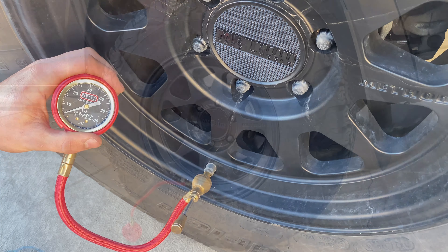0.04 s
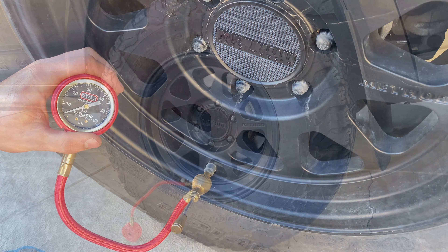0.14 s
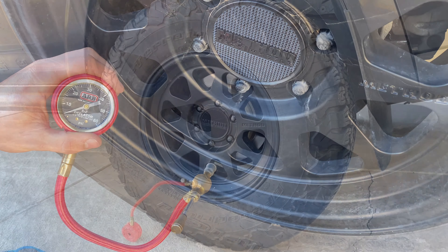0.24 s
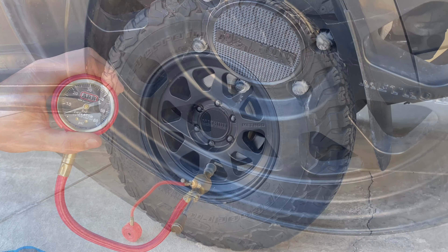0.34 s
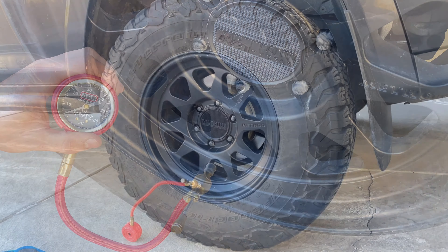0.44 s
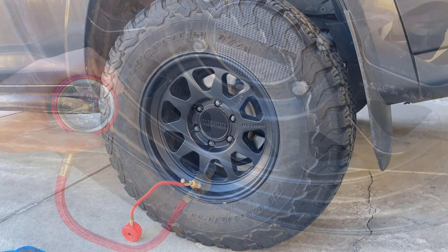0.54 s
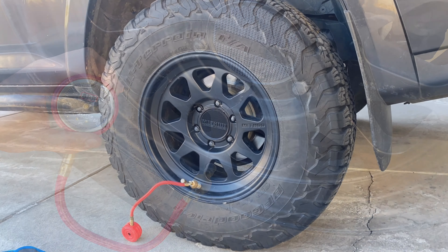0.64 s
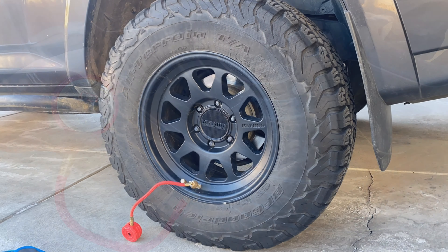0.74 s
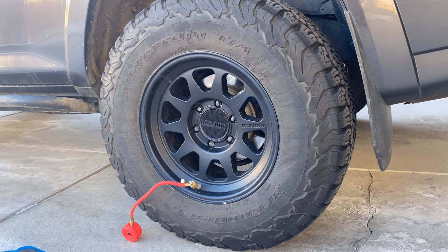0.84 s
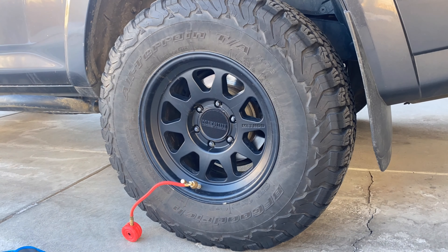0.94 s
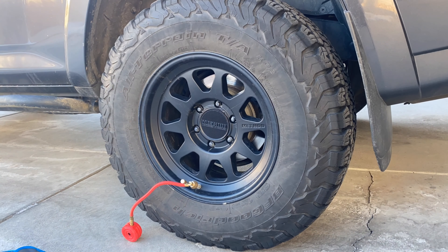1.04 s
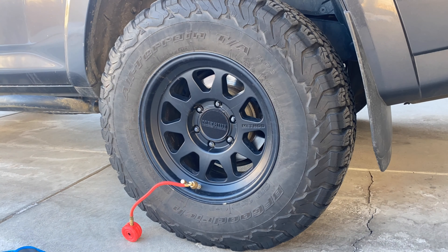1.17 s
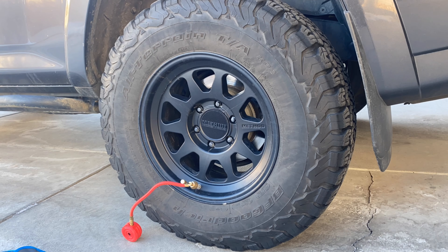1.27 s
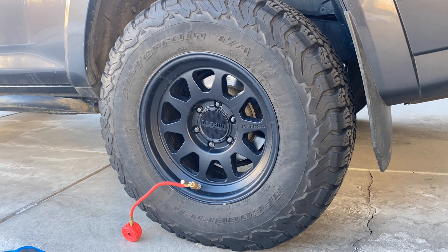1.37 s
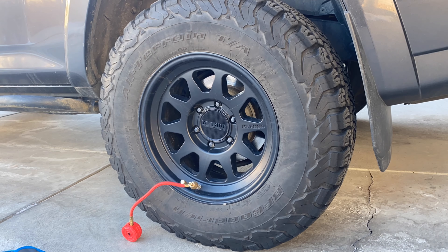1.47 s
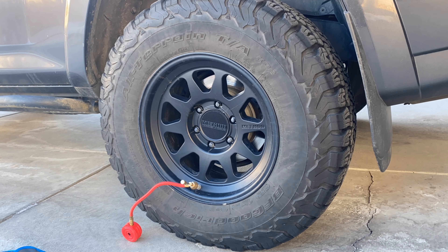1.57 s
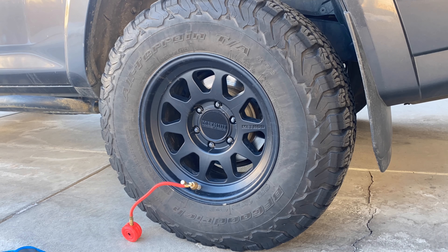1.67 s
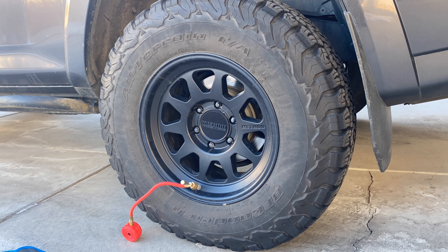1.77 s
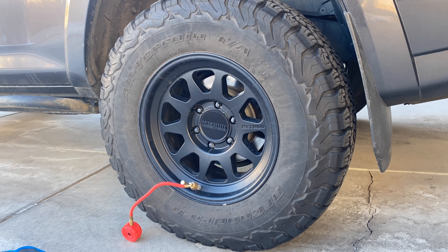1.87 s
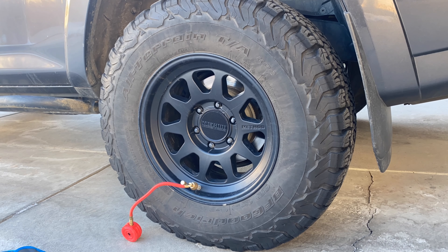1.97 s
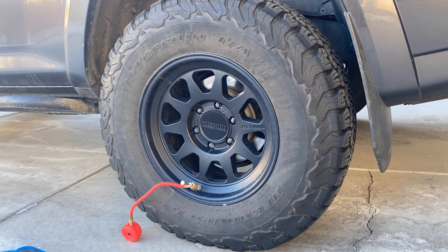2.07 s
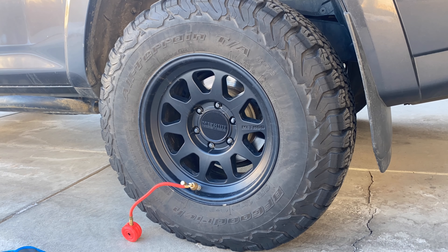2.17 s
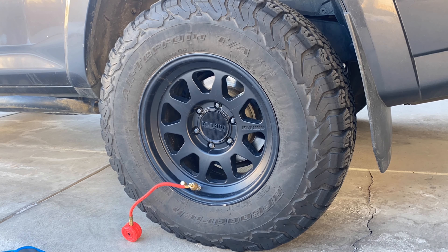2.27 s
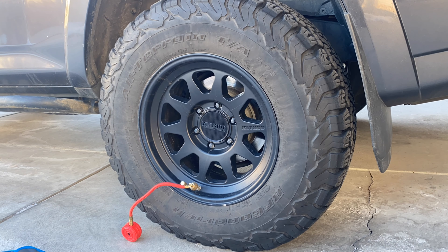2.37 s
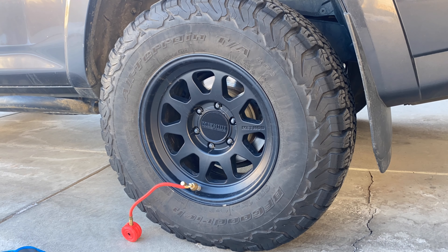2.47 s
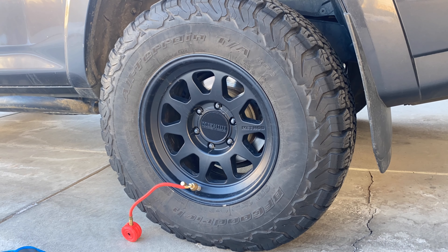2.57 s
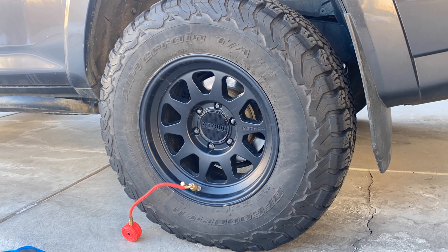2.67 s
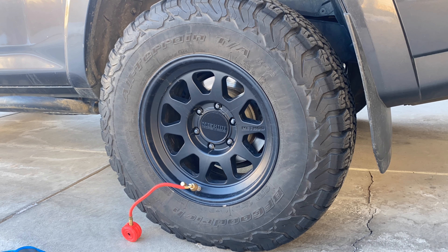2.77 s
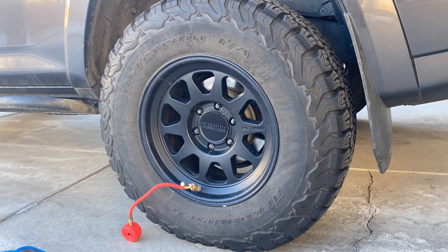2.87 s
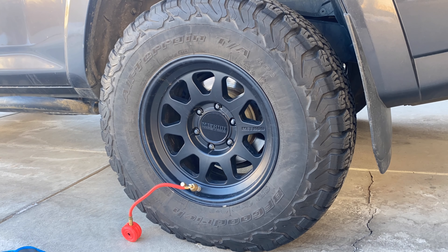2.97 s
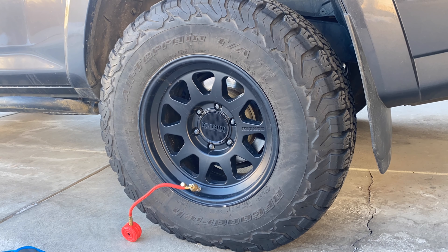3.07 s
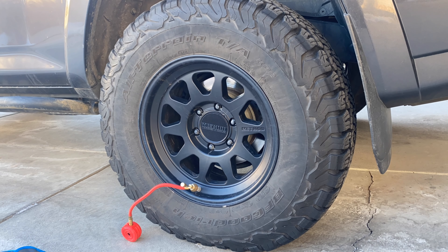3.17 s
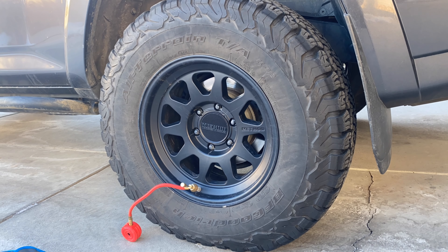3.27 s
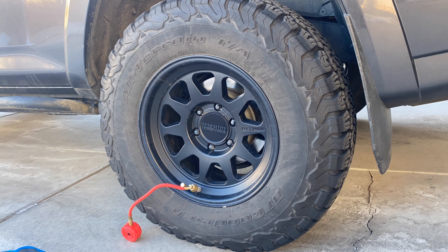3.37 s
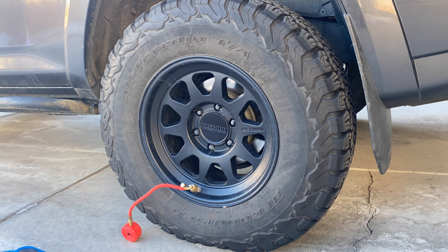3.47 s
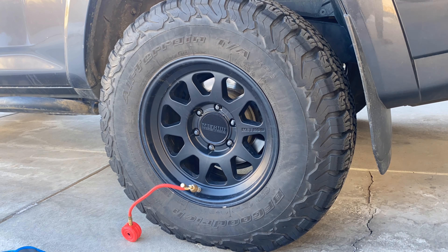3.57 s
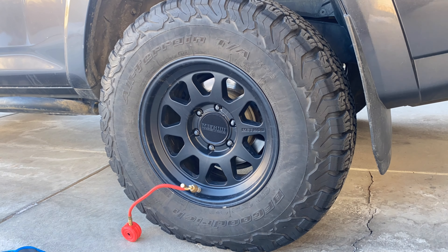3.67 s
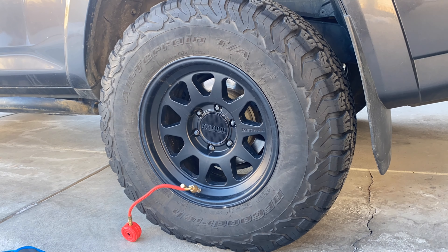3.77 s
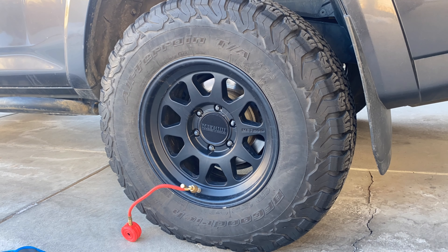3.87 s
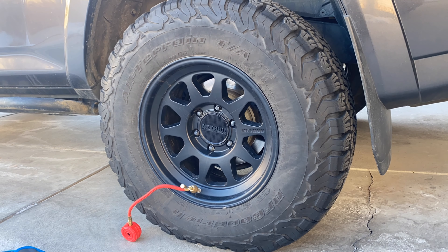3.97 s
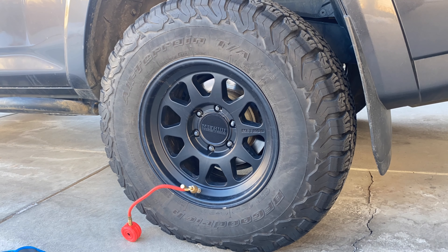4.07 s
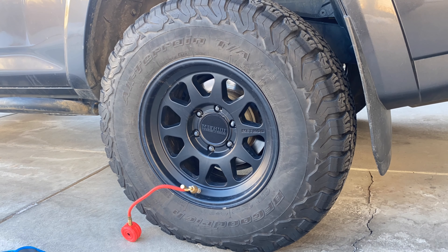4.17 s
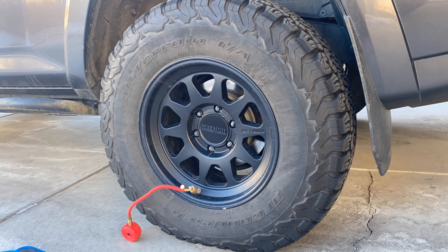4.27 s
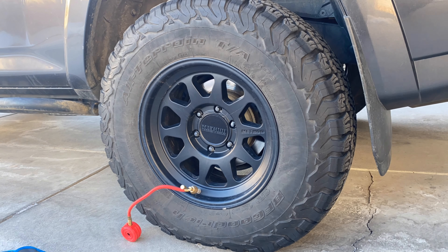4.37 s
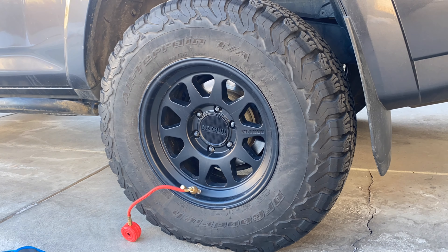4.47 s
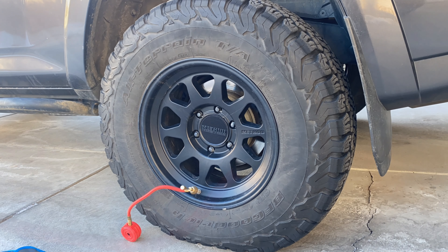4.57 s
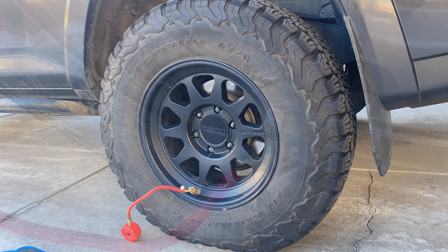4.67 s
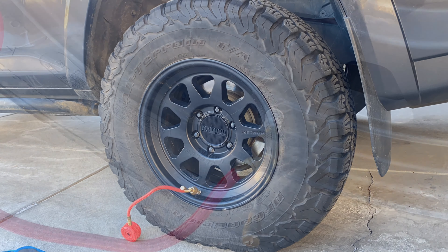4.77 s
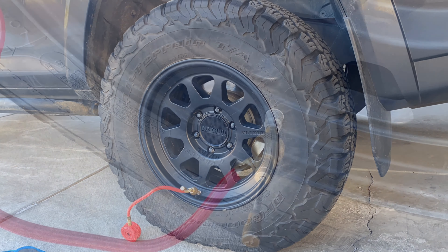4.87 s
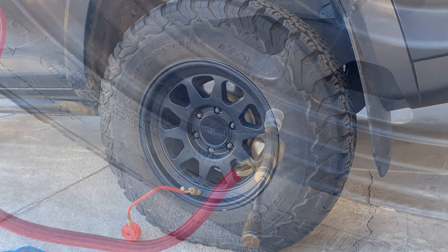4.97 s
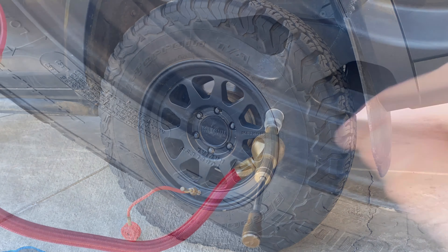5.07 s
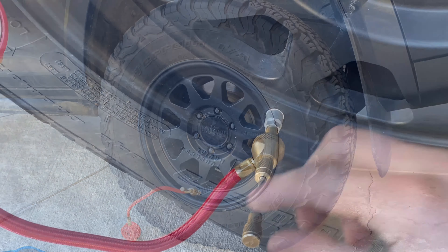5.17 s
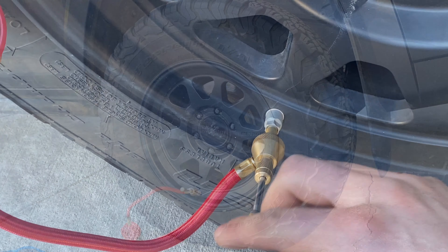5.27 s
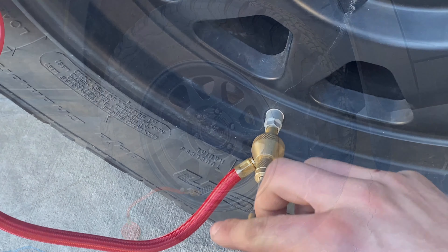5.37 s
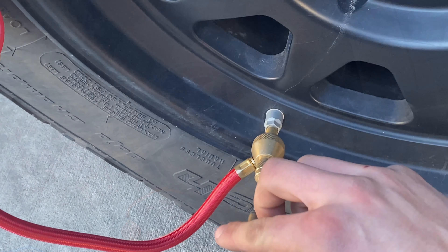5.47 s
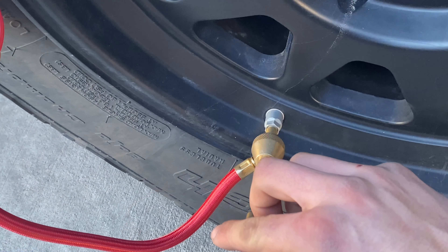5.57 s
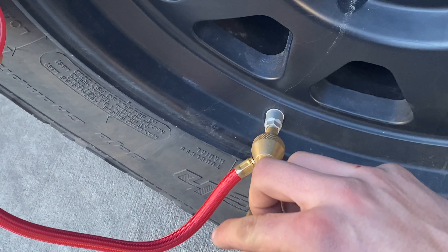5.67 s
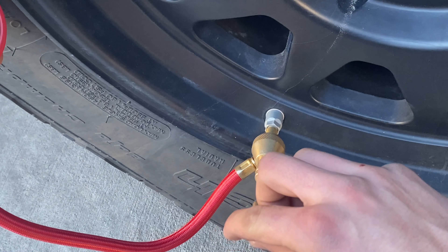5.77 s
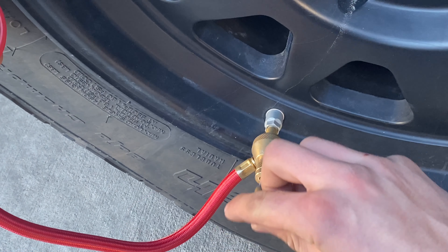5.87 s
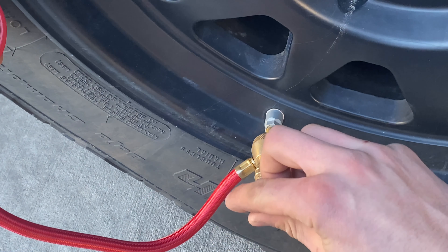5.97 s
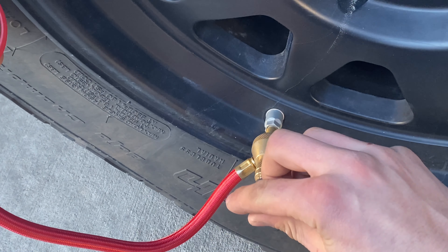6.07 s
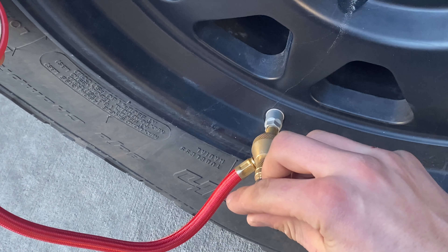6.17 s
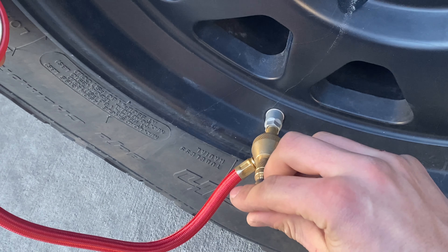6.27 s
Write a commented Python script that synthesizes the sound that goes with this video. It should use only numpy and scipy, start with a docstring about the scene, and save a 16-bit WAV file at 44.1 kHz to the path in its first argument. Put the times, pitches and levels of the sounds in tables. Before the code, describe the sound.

Close outdoor sound in a driveway, wide stereo with short reflections. From 0 s bright, dense air hiss pours from a tyre through a brass deflator, slightly softer for the first 0.2 s, then steady with fine flutter, strongest in the high treble. Faint ticks of brass come at about 0.1, 0.5 and 1.0 s; a dull, distant thud sinks at 1.1 s. The hiss swells a little from 2.5 to 3.8 s, with a tick at 2.9 and a sharper one at 3.9 s. A hard little knock falls at 4.2 s, with a click just after, another at 5.4 s. Beneath lie low traffic rumble, a faint hum and a remote engine droning, dropping in pitch towards the end. From about 5.5 s the hiss throttles away; at 5.9 s a brief air spurt and crisp double clack shut the valve, the wheel rings faintly, and by 6.1 s only quiet background remains until 6.3 s.

```python
"""In a driveway, air jets steadily out of a tyre through a brass deflator: coloured noise that sags slowly.
The brass clicks now and then: short forces set resonances ringing, and the yard scatters the sound.
At the end the hiss is already fading when the valve core is pushed home with a noise spurt and a double
clack; it goes silent just after. Behind it a distant engine drones and slows and a machine hums (both sine
tones), something thuds once (a sinking tone and ringing modes), and far traffic rumbles (low noise)."""
import sys
import numpy as np
from scipy import signal
from scipy.fft import rfft, irfft, next_fast_len
from scipy.io import wavfile

SR = 44100
rng = np.random.default_rng(int(sys.argv[2]) if len(sys.argv) > 2 else 0)


def file_out(sig):
    """Save sig as 16-bit WAV at sys.argv[1]."""
    # one column per channel
    cols = np.atleast_2d(sig).T
    # limit, then scale
    lim = np.clip(cols, -1, 1)
    pcm = np.round(lim * 32767).astype(np.int16)
    wavfile.write(sys.argv[1], SR, pcm)


N = 278706
TIME = np.arange(N) / SR
HZ = np.maximum(np.fft.rfftfreq(2 * next_fast_len(N // 2 + 1), 1 / SR), 1)  # from 1 Hz, so its log exists

# colour of the air jet, relative: f/Hz, level per Hz/dB
JET = [(200, -25.5), (500, -15), (660, -17.5), (870, -13), (1080, -22), (1380, -16), (1880, -11.5),
       (2070, -15), (2450, -12.5), (2680, -14.5), (3100, -15), (3500, -11.5), (4200, -6.5), (4420, -14),
       (4680, -6.5), (4980, -10), (5250, -8.5), (5550, -14.5), (6150, -11), (6600, -10), (7200, -9.5),
       (8550, -3), (9100, -3), (9900, -1.4), (10800, -0.8), (11300, 1.7), (11750, -3.5), (12550, 3.5),
       (13200, 2.3), (14600, 1.7), (14950, -2.5), (15200, 4.3), (15600, -2.5)]
# how the jet differs between left and right: f/Hz, likeness 0-1, left lead/rad, left minus right/dB
JET_SIDES = [(200, 0.96, 0.0, 0.1), (600, 0.53, 0.3, 2.0), (1300, 0.39, -0.1, 0.4), (1700, 0.76, 0.3, -0.9),
             (2400, 0.94, 0.0, 0.1), (2900, 0.58, -0.0, -0.6), (3150, 0.43, -3.2, -0.9),
             (3700, 0.3, -2.9, 0.7), (4300, 0.55, -3.1, 2.1), (4750, 0.25, -4.3, 1.8),
             (5400, 0.86, -3.2, 0.2), (6600, 0.4, 0.6, 0.3), (7900, 0.42, 2.5, -0.0),
             (8600, 0.61, 1.8, 1.1), (9300, 0.85, 3.0, -0.1), (10400, 0.55, 2.5, -4.8),
             (10900, 0.19, 2.2, -6.9), (11350, 0.79, -0.2, -1.5), (12600, 0.78, -0.9, -0.5),
             (14000, 0.68, -1.8, 1.8), (15100, 0.84, -3.0, 2.1)]
# the hiss starts at this level and sinks slowly as the tyre empties
HISS_DB, SAG_DB_PER_S = -27.5, 0.284
# spells of softer or stronger hiss: start t/s, end t/s, fade-in/s, fade-out/s, change/dB
SPELLS = [(-0.1, 0.23, 0.05, 0.034, -3.5), (0.6, 2.84, 0.6, 0.31, -0.83), (2.528, 3.8, 0.22, 0.097, 2.5)]
# the valve is pushed shut: when it seals, time scale of the throttling, how steeply the hiss follows the gap
SEALED_S, THROTTLE_S, THROTTLE_POWER = 6.106, 0.17, 2.3
# the last spurt swells up to the clack: t/s, level/dB relative to the spurt
SPURT_SWELL = [(5.895, -70), (5.904, -15), (5.912, -1), (5.921, 0), (5.927, -18), (5.950, -110)]
# colour of the spurt, relative: f/Hz, level per Hz/dB
SPURT_COLOUR = [(20, -48.5), (200, -8.0), (700, 0.0), (1500, -13.5), (2600, -5.0), (4600, -13.5),
                (6000, 2.0), (8000, 0.0), (9200, -6), (11400, 6.0), (13000, -19.0), (16000, -0.5)]

# light ticks of the brass parts: t/s, nominal peak level/dB, scraping share/dB, ring f/Hz,
# thin below f/Hz, dull above f/Hz
CLICKS = [(0.062, -30.5, 10, 596, 150, 4040), (0.533, -34, 6, 1700, 300, 6000),
          (0.963, -32, 5, 450, 110, 2200), (2.912, -29, 3, 1707, 400, 5000),
          (3.945, -22.5, 8, 5870, 900, 12000), (4.2934, -25.5, -7, 860, 348, 1700),
          (5.430, -30.5, 2, 1510, 497, 10000)]
# resonances of the deflator body: f/Hz, width/Hz, level/dB
BRASS = [(260, 330, -17), (440, 28, -8), (966, 154, -3), (1250, 370, -0.5), (1700, 93, 2), (2510, 1000, -3),
         (4080, 1600, -7), (5900, 1300, 0.5), (7700, 1100, -6)]
# modes of the hose fitting: f/Hz, level/dB, time to fall 60 dB/s
FITTING = [(339.5, -22, .03), (455, -22, 0.15), (690, -20, .025), (975, -1.5, 0.029), (1226, -6.5, 0.023),
           (1380, -2.5, 0.016), (1860, -8, 0.03), (2620, -9, 0.021), (2970, -5, 0.023),
           (3320, -10.5, 0.027), (4575, -11.5, 0.038), (5870, -2, 0.018), (8400, -11, 0.012)]
# modes of the valve as its core seats: f/Hz, level/dB, time to fall 60 dB/s
VALVE = [(140, -12.5, 0.035), (250, -14.5, 0.024), (336, -11.5, 0.026), (424, -14.5, 0.028),
         (516, -19.5, .05), (700, -19, .035), (834, -9, 0.045), (963, -10, .035), (1090, -10.5, 0.062),
         (1375, -4.5, .032), (1760, -15, .03), (2120, -13, 0.028), (2380, -13, 0.026), (2620, -11.5, 0.035),
         (5760, -11, .025), (5850, -6.5, 0.022), (6840, -11, 0.015), (7160, -4, 0.014), (11400, -18, 0.017)]
# modes of the sliding stem: f/Hz, level/dB, time to fall 60 dB/s
STEM = [(350, -15, .03), (620, -20, 0.027), (781, -8, 0.056), (985, -14.5, .03), (1324, -4, 0.032),
        (1460, -9, 0.037), (1690, -19, 0.037), (2160, -17.5, 0.045), (2640, -21.5, 0.045), (3120, -22, .05),
        (3810, -15, .045), (3990, -9.5, .04), (4220, -10, .04), (4490, -11.5, .04), (4580, -13.5, 0.058),
        (5100, -11, 0.04), (5450, -13, .035), (5770, -16, 0.03)]
# hard knocks: t/s, ring level/dB, crack level/dB before filtering, crack rise/s, rattle share/dB,
# thin below f/Hz, dull above f/Hz, echo delay/s, echo level/dB, clean strike share 0-1, modes that ring
KNOCKS = [(4.2360, -15.5, -7.5, 0.0006, -21.5, 620, 9700, .0036, -8, 0.16, FITTING),
          (5.9221, -11.5, -4.5, 0.0003, -19.5, 110, 8100, 0.00236, -1, 0.75, VALVE),
          (5.9505, -15, -6.5, 0.00047, -16, 250, 5570, 0.00184, -11, 0.67, STEM)]
# both closing knocks travel down the valve stem into the wheel: t/s, level/dB
WHEEL_BLOW = [(5.9227, -31), (5.951, -27.5)]
# modes of the wheel: f/Hz, level/dB, time to fall 60 dB/s
WHEEL = [(488, -10, 0.19), (1047, -19.5, 0.91), (1066, -20, 0.46), (1124, -4, 0.24), (1434, -27, .35),
         (1730, -37, .7), (2191, -32, 0.59), (2283, -24, 0.66), (3128, -33, .8)]
# faint wheel overtones: range, middle level, time to fall 60 dB
OVERTONES_HZ, OVERTONES_DB, OVERTONES_T60_S = (1264, 5300), -36.5, 0.56
# reverberation between house and car: f/Hz, time to fall 60 dB/s
YARD_T60 = [(200, 0.19), (1000, 0.17), (4000, 0.18), (8000, 0.038), (16000, 0.093)]

# distant engine, cruising, easing off, pulling again and running down: t/s, firing rate f/Hz
ENGINE_SPEED = [(0, 110.9), (1.38, 112), (1.6, 97.75), (2.1, 104.7), (2.8, 104.1), (3.6, 114), (4.5, 118.4),
                (4.85, 94.06), (5.4, 86.4), (5.75, 65.22), (6.32, 66.63)]
ENGINE_DB, ENGINE_SWELL_S = -50, 0.13   # its level between swells; spread of a bell-shaped swell
# its drone swells: t/s, rise/dB
ENGINE_SWELLS = [(0.15, 7), (2.38, 5.5), (3.37, 12), (4.33, 8), (4.83, 7.5), (5.33, 11.5), (5.85, 9),
                 (6.29, 8.5)]
# machine hum, which sags in pitch for a while: t/s, f/Hz
HUM_PITCH = [(0, 226), (1.3, 227), (1.7, 215.2), (4.4, 216.3), (4.9, 223.5), (6.32, 225.6)]
# its level before the overall trim: t/s, level/dB
HUM_LEVEL = [(0, -59), (1.3, -62.5), (1.7, -49.5), (2.5, -51.5), (3.4, -61.5), (5.5, -47.5), (6.32, -48)]
# two contacts of a dull thud: t/s, level/dB before filtering
THUDS = [(1.1245, -26.5), (1.153, -32)]
# its modes: f/Hz, level/dB, time to fall 60 dB/s
THUD_MODES = [(175, -14, 0.06), (246, -5, 0.079), (282, -7.5, 0.09)]
# the boom under the thud
BOOM_S, BOOM_DB, BOOM_ATTACK_S, BOOM_HOLD_S, BOOM_RELEASE_S = 1.113, -24.5, 0.015, .044, 0.068
BOOM_HZ, BOOM_SAG_HZ_PER_S = 100, 81
# street noise over time, before trims: t/s, low rumble/dB, upper rumble/dB, deep rumble/dB
STREET_LEVEL = [(0, -49.5, -50.5, -85), (4.4, -55.5, -48, -82), (4.8, -51, -48.5, -61),
                (5.3, -45.5, -47, -55), (5.7, -54, -49.5, -52), (6.32, -44.5, -50.5, -65.5)]
# colours of the three rumbles, relative; each one: f/Hz, level per Hz/dB
LOW_RUMBLE = [(20, -52), (40, -17.5), (60, 2), (85, 14), (110, 9.5), (170, -32.5), (1000, -100)]
UPPER_RUMBLE = [(20, -65), (60, -38), (100, 1.5), (140, 0.5), (195, -3), (250, -8.5), (330, -11.5),
                (450, -20.5), (650, -25), (1050, -26), (1700, -33), (4000, -46.5), (7000, -63),
                (16000, -73)]
DEEP_RUMBLE = [(20, -31), (38, -9), (52, 3.5), (70, 2), (160, -52)]
CUTOFF_HZ = 15720   # nearly nothing is left above this


def jet(flutter_db=0.86, flutter_rate_hz=25):
    """Turbulent air makes bright noise, strongest above 12 kHz; it follows the flow and flutters slightly."""
    flutter = from_db(flutter_db * drift(flutter_rate_hz))
    return flow() * flutter * noise(JET, *at_hz(JET_SIDES, HZ))


def flow():
    """Gain of the hiss: slowly sinking, with a few spells, then throttled ever faster until the valve seals."""
    db = HISS_DB - SAG_DB_PER_S * TIME
    for start, end, fade_in, fade_out, change_db in SPELLS:
        fade = np.minimum((TIME - start) / fade_in, (end - TIME) / fade_out)
        db = db + change_db * np.clip(fade, 0, 1)
    gap = 1 - np.exp(-np.maximum(SEALED_S - TIME, 0) / THROTTLE_S)
    return from_db(db) * gap ** THROTTLE_POWER


def spurt(level_db=-22):
    """The closing valve squeezes out a last short burst of noise that swells up to the clack."""
    swell_db, = in_time(SPURT_SWELL)
    return from_db(level_db + swell_db) * (TIME > 5.895) * noise(SPURT_COLOUR, coherence=.6)


def deflator(crest_db=10):
    """Ticks and knocks of the brass parts with their reflections; the closing pair rings the wheel."""
    out = np.zeros((2, N))
    for s, peak_db, *contact in CLICKS:
        add(out, s, from_db(peak_db - crest_db) * click(*contact))   # from nominal peak to rms
    for s, *contact in KNOCKS:
        add(out, s, knock(*contact))
    return out + yard(out, wet_db=-14.5) + wheel()


def click(scrape_db, ring_hz, thin_hz, dull_hz, scrape_s=0.013, chatter_s=0.024, chatter_db=-14,
          raw_db=-17, ring_db=2, echo_s=0.00241, echo_db=-11, side_db=-3):
    """A contact, scraping and chatter ring the brass; the concrete returns an echo. Attack has rms 1."""
    t = TIME[:SR // 8]
    shape = np.exp(-t / scrape_s) + from_db(chatter_db) * np.exp(-t / chatter_s)
    mid, side = rng.standard_normal((2, len(t))) * shape / np.linalg.norm(shape)
    # mainly the treble differs between the sides
    side = from_db(side_db) * highpass(side, 1500, order=1) * [[1], [-1]]
    force = (t == 0) + from_db(scrape_db) * (mid + side)
    body = sum(from_db(db) * resonate(force, hz, width) for hz, width, db in BRASS)
    own_ring = from_db(ring_db) * resonate(force, ring_hz, ring_hz * 0.32)
    sound = body + own_ring + from_db(raw_db) * force
    sound = lowpass(highpass(sound, thin_hz), dull_hz, order=4)
    echo = np.roll(lowpass(sound, 4500), int(echo_s * SR), axis=1)
    sound = sound + from_db(echo_db) * echo
    attack = sound[:, :SR // 400]
    return sound / np.sqrt(np.mean(attack ** 2))


def knock(ring_db, crack_db, rise_s, rattle_db, thin_hz, dull_hz, echo_s, echo_db, clean, modes,
          rattle_s=0.015, side_db=-7, echo_dull_hz=3000, spread_s=0.0018):
    """Metal meets metal: a strike in a gritty crack, a rattle, an echo off the rim; the struck part rings."""
    t = TIME[:SR // 4]
    mid, side = rng.standard_normal((2, len(t)))
    grit = mid + from_db(side_db) * highpass(side, 1500, order=1) * [[1], [-1]]
    contact = t / rise_s * np.exp(1 - t / rise_s)
    strike = np.arange(len(t)) == np.argmax(contact)
    # keep only the phases, so all frequencies are equally strong; then shorten
    burst = irfft(np.exp(1j * np.angle(rfft(grit * contact))), len(t)) * np.exp(-t / spread_s)
    clean = np.clip(clean, 0, 1)
    hit = np.linalg.norm(contact) * (np.sqrt(clean) * strike + np.sqrt(1 - clean) * burst)
    rattle = from_db(rattle_db) * np.exp(-t / rattle_s) * grit
    crack = from_db(crack_db) * lowpass(highpass(hit + rattle, thin_hz), dull_hz, order=6)
    echo = from_db(echo_db) * np.roll(lowpass(crack, echo_dull_hz), int(echo_s * SR), axis=1)
    tone = sum(from_db(db - 60 * t / t60) * np.sin(2 * np.pi * (hz * t + rng.random()))
               for hz, db, t60 in modes)
    return crack + echo + from_db(ring_db) * tone * (1 - np.exp(-t / rise_s))


def wheel(count=36, scatter_db=3):
    """The closing knocks ring a few clear wheel modes under faint overtones that differ on each side."""
    places = rng.random((2, count))
    sizes_db = OVERTONES_DB + scatter_db * rng.standard_normal((2, count))
    low, high = OVERTONES_HZ
    haze = []
    for side_places, side_db in zip(places, sizes_db):
        modes = [(low * (high / low) ** u, db, OVERTONES_T60_S) for u, db in zip(side_places, side_db)]
        haze.append(ring(WHEEL_BLOW, modes))
    return ring(WHEEL_BLOW, WHEEL) + np.array(haze)


def yard(x, wet_db):
    """Scattered reflections, unrelated on the two sides; each band of noise dies away at its own pace."""
    t, edges, tail = TIME[:SR // 2], np.geomspace(150, 16000, 9), 0
    for low, high in zip(edges, edges[1:]):
        sos = signal.butter(2, [low, high], "band", fs=SR, output="sos")
        band = signal.sosfilt(sos, rng.standard_normal((2, len(t))))
        t60, = at_hz(YARD_T60, np.sqrt(low * high))
        tail = tail + band * from_db(-60 * t / t60)
    tail = tail * (1 - np.exp(-t / 0.0023))   # soft build-up
    tail = tail / np.sqrt(np.sum(tail ** 2) / 2)
    return from_db(wet_db) * signal.fftconvolve(x, tail, axes=1)[:, :N]


def engine(second_db=-15, third_db=-21, wander=0.0198, throb_db=3.0):
    """A distant exhaust note at the firing rate, swelling and a little uneven, with two weak overtones."""
    hz, = in_time(ENGINE_SPEED)
    swells_db = sum(rise_db * np.exp(-.5 * ((TIME - s) / ENGINE_SWELL_S) ** 2)
                    for s, rise_db in ENGINE_SWELLS)
    phase = 2 * np.pi * np.cumsum(hz * (1 + wander * drift(7.06))) / SR
    overtones = from_db(second_db) * np.sin(2 * phase) + from_db(third_db) * np.sin(3 * phase)
    gain = from_db(ENGINE_DB + swells_db + throb_db * drift(9.2))
    return gain * np.sqrt(2) * (np.sin(phase) + overtones)


def hum(trim_db=-3.5, waver_db=1.5):
    """The tone of a machine nearby: one sine that follows the pitch table and wavers in level."""
    (hz,), (db,) = in_time(HUM_PITCH), in_time(HUM_LEVEL)
    gain = from_db(db + trim_db + waver_db * drift(2.7))
    return gain * np.sqrt(2) * np.sin(2 * np.pi * np.cumsum(hz) / SR)


def thud(thin_hz=110, dull_hz=380):
    """A dull, heavy bump some way off: two soft contacts over a short boom that sinks in pitch."""
    t = np.maximum(TIME - BOOM_S, 0)
    left_s = BOOM_ATTACK_S + BOOM_HOLD_S + BOOM_RELEASE_S - t
    shape = np.clip(np.minimum(t / BOOM_ATTACK_S, left_s / BOOM_RELEASE_S), 0, 1)
    tone = np.sin(2 * np.pi * (BOOM_HZ - .5 * BOOM_SAG_HZ_PER_S * t) * t)
    contacts = lowpass(highpass(ring(THUDS, THUD_MODES), thin_hz), dull_hz, order=4)
    return from_db(BOOM_DB) * shape * tone + contacts


def street(upper_trim_db=2.):
    """Far traffic as noise: a low rumble, a wash above it and a deep murmur that joins near the end."""
    low_db, upper_db, deep_db = in_time(STREET_LEVEL)
    low = from_db(low_db) * noise(LOW_RUMBLE, coherence=1.0)
    upper = from_db(upper_db + upper_trim_db) * noise(UPPER_RUMBLE, coherence=0.86)
    deep = from_db(deep_db) * noise(DEEP_RUMBLE, coherence=0.98)
    return low + upper + deep


def noise(spectrum, coherence=0, lead=0, balance_db=0):
    """Stereo noise of rms about 1 with a given colour, likeness, left phase lead and balance of the sides."""
    shared, left, right = rng.standard_normal((3, len(HZ))) + 1j * rng.standard_normal((3, len(HZ)))
    alike = np.clip(coherence, 0, 1)
    left = np.sqrt(alike) * shared * np.exp(1j * lead) + np.sqrt(1 - alike) * left
    right = np.sqrt(alike) * shared + np.sqrt(1 - alike) * right
    sides = np.array([left * from_db(balance_db / 2), right * from_db(-balance_db / 2)])
    colour_db, = at_hz(spectrum, HZ)
    return rms_one(irfft(sides * from_db(colour_db)))[:, :N]


def drift(rate_hz):
    """Smooth random wander of spread about 1: noise slowed by two equal low-passes at `rate_hz`."""
    step = 40   # samples between points, joined by straight lines
    r = np.exp(-2 * np.pi * rate_hz * step / SR)
    slow = signal.lfilter([1], [1, -2 * r, r * r], rng.standard_normal(N // step + 2002))
    slow = slow[2000:]   # skip the filter's start-up
    return np.interp(np.arange(N) / step, np.arange(len(slow)), rms_one(slow))


def ring(blows, modes):
    """Blows (t/s, level/dB) set decaying sine modes ringing."""
    t, force = TIME[:SR], np.zeros(N)
    for s, db in blows:
        force[int(s * SR)] += from_db(db)
    answer = sum(from_db(db - 60 * t / t60) * np.sin(2 * np.pi * hz * t) for hz, db, t60 in modes)
    return signal.fftconvolve(force, answer)[:N]


def resonate(x, hz, width_hz):
    """One resonance with gain about 1 at its top."""
    r = np.exp(-np.pi * width_hz / SR)
    feedback = [1, -2 * r * np.cos(2 * np.pi * hz / SR), r * r]
    return signal.lfilter(np.array([1, 0, -1]) * (1 - r * r) / 2, feedback, x)


def lowpass(x, hz, order=2):
    """Butterworth low-pass: dulls the sound."""
    return signal.sosfilt(signal.butter(order, min(hz, .45 * SR), fs=SR, output="sos"), x)


def highpass(x, hz, order=3):
    """Butterworth high-pass: thins the sound."""
    return signal.sosfilt(signal.butter(order, hz, "high", fs=SR, output="sos"), x)


def add(out, s, sound):
    """Mix a sound in at time s, in seconds."""
    i = int(s * SR)
    out[..., i:i + sound.shape[-1]] += sound[..., :N - i]


def in_time(rows):
    """Each column of a time table, joined by straight lines, at every sample."""
    s, *columns = np.transpose(rows)
    return [np.interp(TIME, s, c) for c in columns]


def at_hz(rows, hz):
    """Each column of a frequency table at the given frequencies, on a log scale."""
    points, *columns = np.transpose(rows)
    return [np.interp(np.log(hz), np.log(points), c) for c in columns]


def from_db(db):
    """Decibels to gain."""
    return 10 ** (np.asarray(db) / 20)


def rms_one(x):
    """Scale to rms 1."""
    return x / np.sqrt(np.mean(x ** 2) + 1e-20)


def scene():
    """The deflator in front, the neighbourhood behind."""
    return jet() + spurt() + deflator() + engine() + hum() + thud() + street()


def record(dry):
    """The highest peaks are rounded and the top of the treble is cut steeply."""
    rounded = np.tanh(dry)
    return signal.sosfilt(signal.ellip(12, .1, 90, CUTOFF_HZ, fs=SR, output="sos"), rounded)


dry = scene()
out = record(dry)
file_out(out)
```